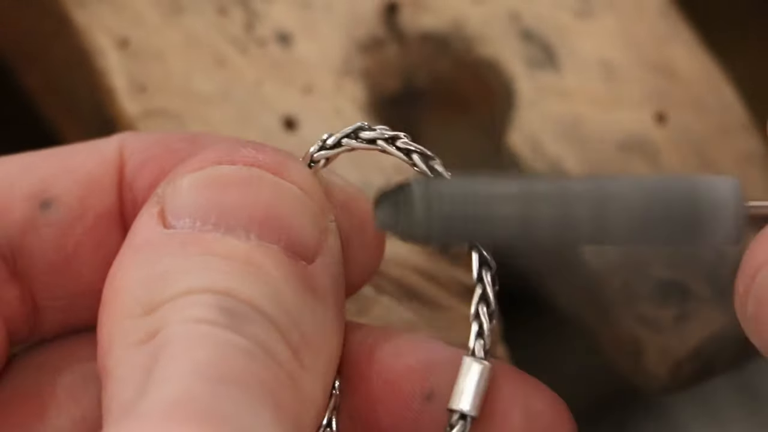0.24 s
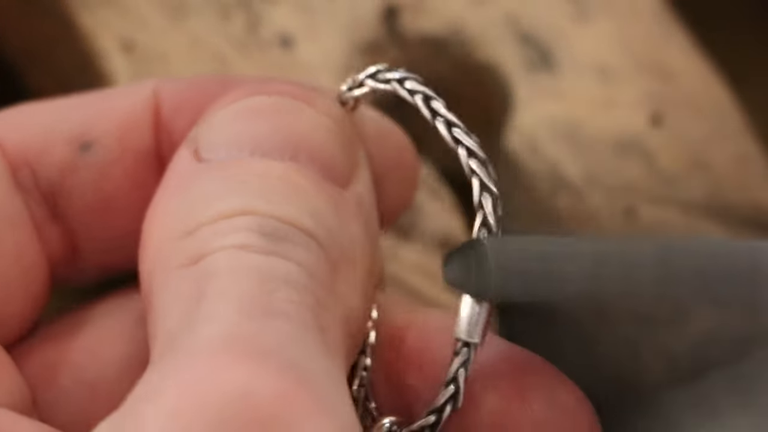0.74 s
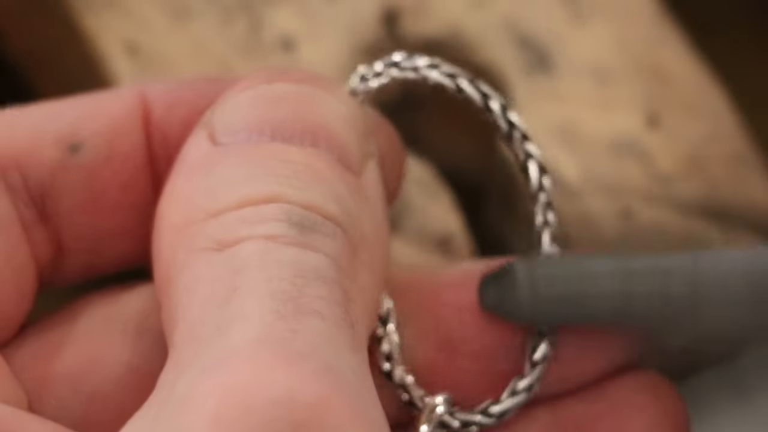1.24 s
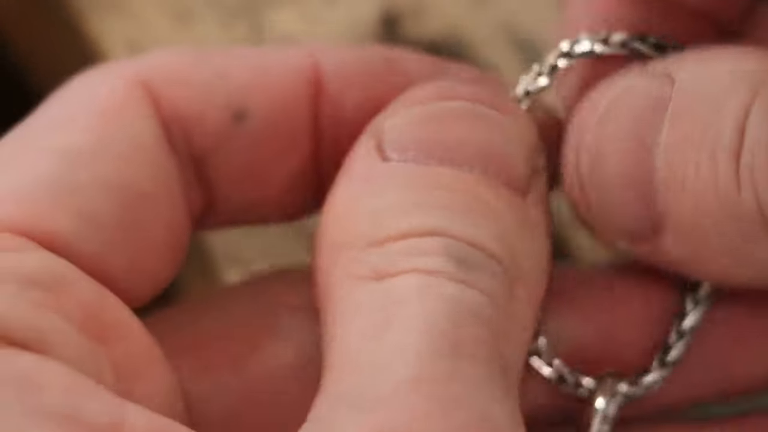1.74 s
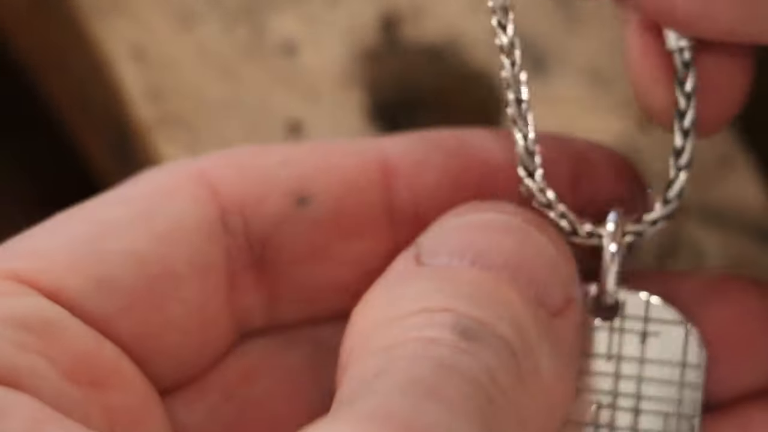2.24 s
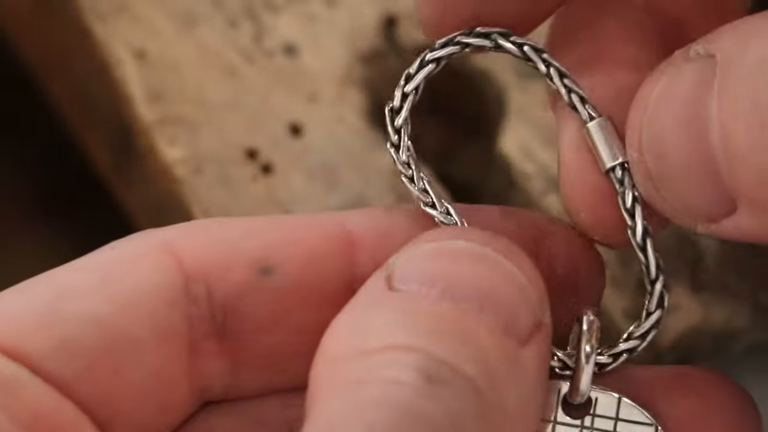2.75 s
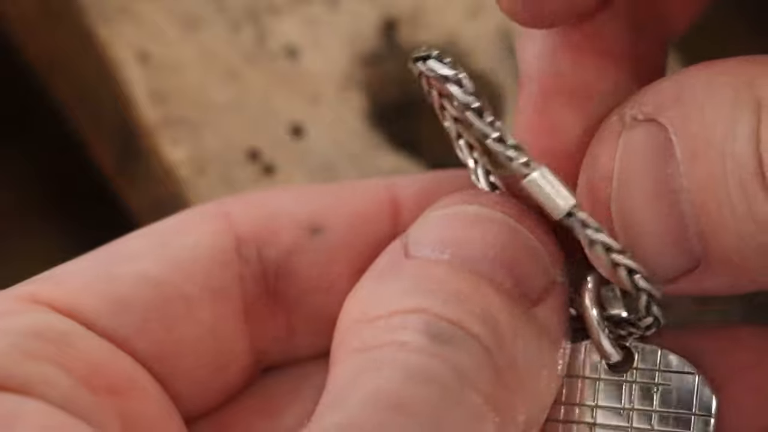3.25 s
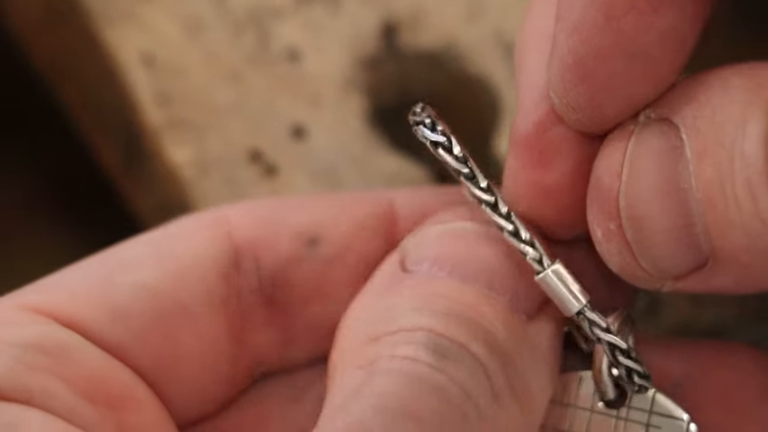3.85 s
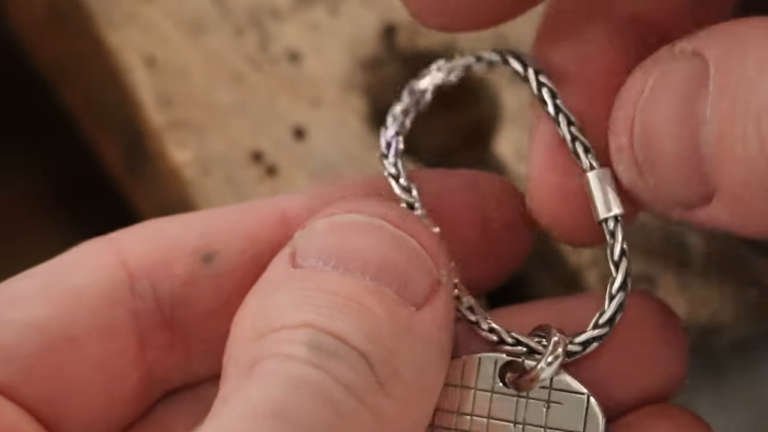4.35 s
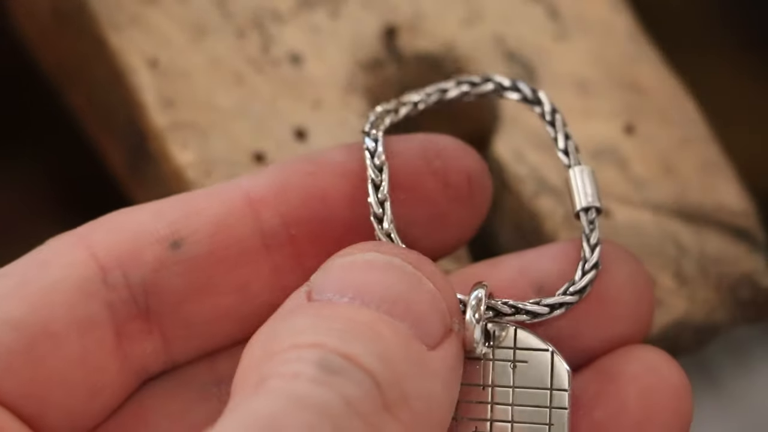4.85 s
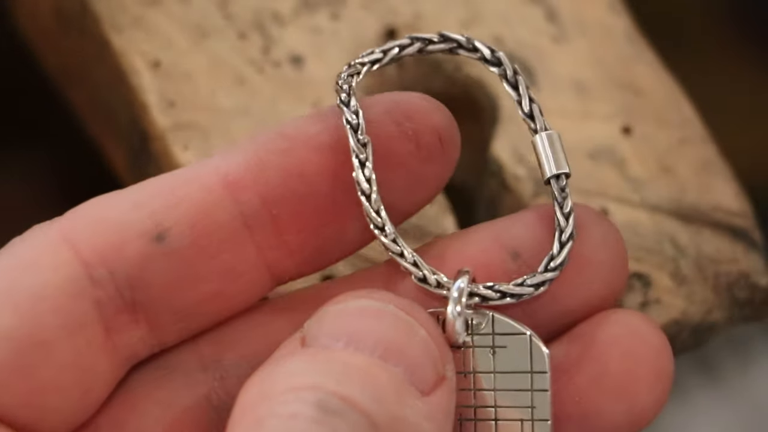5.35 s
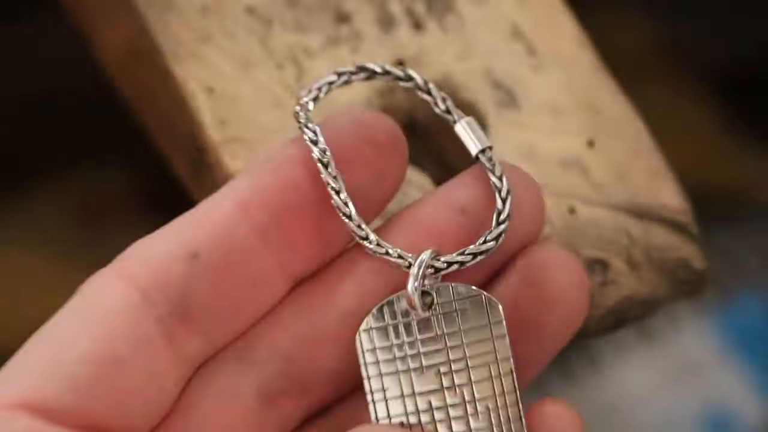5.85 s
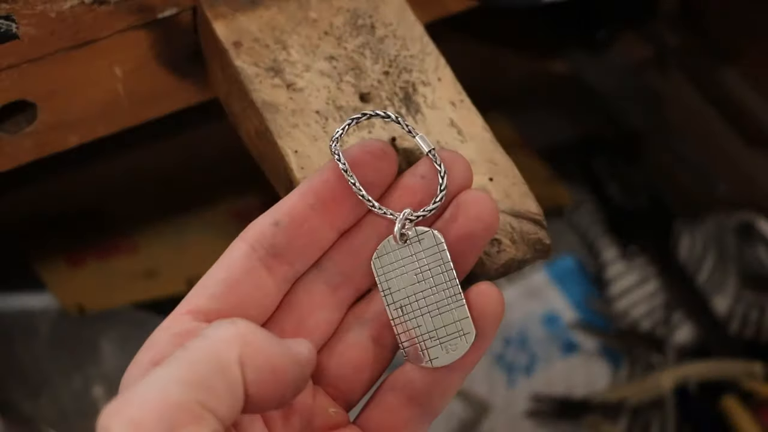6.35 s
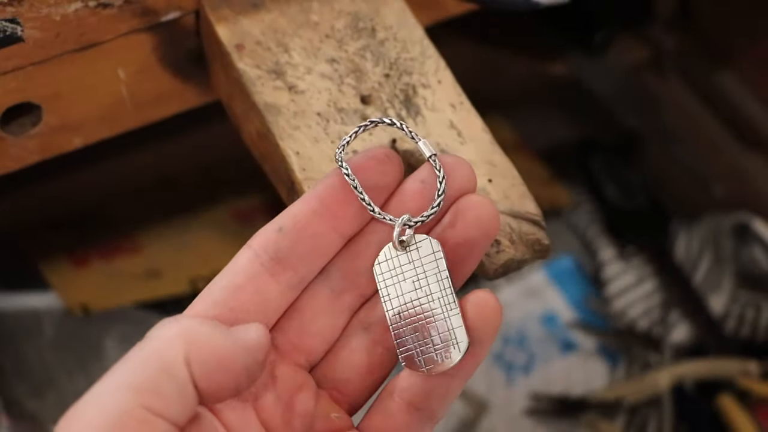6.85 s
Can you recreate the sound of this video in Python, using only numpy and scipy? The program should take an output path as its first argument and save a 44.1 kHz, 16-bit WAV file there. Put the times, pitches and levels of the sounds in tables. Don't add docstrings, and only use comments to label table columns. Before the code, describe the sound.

A small rotary tool grinds a metal chain with a raspy whine, then coasts and hums until two knocks stop it, leaving faint workshop rustles.

```python
import sys
import numpy as np
from scipy import signal
from scipy.fft import rfft, irfft, next_fast_len
from scipy.io import wavfile

SR = 44100
rng = np.random.default_rng(int(sys.argv[2]) if len(sys.argv) > 2 else 0)


def master(y):
    cut = np.clip(np.atleast_2d(y).T, -1, 1)
    pcm = np.round(cut * 32767)
    wavfile.write(sys.argv[1], SR, pcm.astype(np.int16))


def volts_from_db(level):
    exponent = np.asarray(level, float) / 20
    return 10 ** exponent


N = 312713
T = np.arange(N) / SR

# f/Hz, likeness/1
NEAR_ALIKE = [(60, .95), (130, .999), (270, .995), (570, .9), (1200, .55), (2600, .45), (5500, .4),
              (9000, .2)]
# f/Hz, left minus right level/dB
NEAR_PAN = [(400, 3.5), (1100, 2), (2000, -7.5), (3600, -4.5), (6400, -1.5), (11000, -3.5)]
# f/Hz, phase/rad
NEAR_LEAD = [(0, -0.7), (3000, -0.85), (5300, 1), (7300, -0.91), (11700, 0.94)]
# f/Hz, likeness/1
FAR_ALIKE = [(60, .2), (130, .85), (270, .9), (570, .66), (1210, .3), (2570, .03), (11600, 0)]
# f/Hz, left minus right level/dB
FAR_PAN = [(400, 2), (1100, 1.1), (3600, 0), (11000, 1.5)]
NO_LEAD = [(0, 0), (SR, 0)]  # f/Hz, phase/rad
NEAR, FAR = (NEAR_ALIKE, NEAR_PAN, NEAR_LEAD), (FAR_ALIKE, FAR_PAN, NO_LEAD)


def curves(table):
    s, *columns = np.transpose(table)
    fade_in = np.clip((T - s[0]) / 0.0069 + (s[0] == 0), 0, 1)
    fade_out = np.clip((s[-1] - T) / 0.023, 0, 1)
    return [fade_in * fade_out] + [np.interp(T, s, c) for c in columns]


def on_hz(table, hz):
    f, v = np.transpose(table)
    return np.interp(np.log(hz + 1), np.log(f), v)


def walk(rate, size=N):
    k = int(SR / rate)
    levels = rng.standard_normal(size // k + 2)
    return np.interp(np.arange(size) / k, np.arange(size // k + 2), levels) * 1.06


def swells(rows, attack, t60, column=2):
    out = np.zeros(N)
    for r in rows:
        a = int(r[0] * SR)
        t = T[a:a + int((r[1] + 2 * t60) * SR)] - r[0]
        rise = np.clip(t / attack + (a == 0), 0, 1)
        decay = np.exp(-np.log(1000) * np.clip(t - r[1], 0, 1) / t60)
        out[a:a + len(t)] += volts_from_db(r[column]) * rise * decay
    return out


def hiss(spectrum, ports, span, flicker_db, rate, gate=None):
    a, b = int(span[0] * SR), min(int(span[1] * SR), N)
    size = next_fast_len(b - a)
    hz = np.arange(size // 2 + 1) * SR / size
    noise = rng.standard_normal((2, size))
    if gate is not None:
        noise[:, :b - a] *= gate[a:b]
    mid, side = rfft(noise)
    alike, pan, lead = ports
    likeness = np.clip(on_hz(alike, hz), -.9, 1)
    shade = np.clip(hz / 1100, 0, 1) ** 2
    phase = shade * np.interp(hz, *np.transpose(lead))
    lean = volts_from_db(shade * on_hz(pan, hz) / 2) * np.exp(.5j * phase)
    mid, side = mid * np.sqrt(1 + likeness), side * np.sqrt(1 - likeness)
    colour_db = on_hz(spectrum, hz)
    pair = np.array([(mid + side) * lean, (mid - side) / lean]) * volts_from_db(colour_db)
    if flicker_db:
        place = 2 * np.log2(hz + 1)
        heard = place[(colour_db > -38) & (hz > spectrum[0][0]) & (hz < spectrum[-1][0])]
        part = 0
        for k in range(int(heard[0]), int(heard[-1]) + 2):
            band = irfft(pair * np.clip(1 - abs(place - k), 0, 1), size)
            part = part + band * volts_from_db(flicker_db * walk(rate, size=size))
    else:
        part = irfft(pair, size)
    out = np.zeros((2, N))
    out[:, a:b] = part[:, :b - a] / np.std(part.mean(0))
    return out


def tone(hz, wobble_db, rate, drift=0., until=7.1):
    size = min(int(until * SR), N)
    turns = np.cumsum((hz + 0 * T)[:size] + drift * walk(rate, size=size)) / SR + rng.random()
    line = np.sqrt(2) * np.sin(2 * np.pi * turns) * volts_from_db(wobble_db * walk(rate, size=size))
    return np.pad(line, (0, N - size))


def ring(modes, spread, push):
    t = np.arange(int(.2 * SR)) / SR
    y = 0
    for hz, db, t60 in modes:
        share, detune = rng.standard_normal(2)
        sine = np.sin(2 * np.pi * hz * (1 + spread * detune) * t)
        y = y + volts_from_db(db + 2.5 * share) * sine * 1000. ** (-t / t60)
    y = np.convolve(y, np.hanning(int(push * SR) + 3))[:len(t)]
    return y / abs(y).max()


def burst(hz, width_hz, t60):
    t = np.arange(int(.2 * SR)) / SR
    edges = np.clip([hz - width_hz / 2, hz + width_hz / 2], 300, 12000)
    noise = 0.7 * rng.standard_normal(len(t)) + 0.5 * rng.standard_normal((2, len(t)))
    noise = noise * np.minimum(t / .0006, 1) * 1000. ** (-t / t60)
    y = signal.sosfilt(signal.butter(2, edges, "bandpass", fs=SR, output="sos"), noise)
    return y / abs(y.mean(0)).max()


def add(out, s, sound):
    i = int(s * SR)
    out[:, i:i + sound.shape[-1]] += sound[..., :N - i]


def shaft(turns_hz, on, press, fast_db):
    # t/s, level/dB
    unbalance = [(0, -36), (.25, -43), (.55, -39), (.73, -33.5), (1.03, -47), (1.5, -43), (1.63, -32.5),
                 (1.66, -31)]
    # t/s, level/dB
    rundown = [(1.62, -35), (1.69, -33), (2.034, -45.5), (2.166, -46), (2.22, -37)]
    # t/s, length/s, level/dB
    straight = [
        (0, 0.18, -35),
        (.22, 0.52, -31),
        (.85, 0.675, -33),
    ]
    # t/s, length/s, level/dB
    bends = [(0, 0.093, -33), (.23, 0.014, -34), (.56, 0.012, -31), (.74, 0.1, -32), (1.14, 0.089, -30.5),
             (1.24, 0.32, -36)]
    # multiple of shaft rate/1, level/dB
    shaft_orders = [(1, -7), (2, -1.5), (3, 0), (4, -1), (5, -8), (6, -11.5), (7, -11), (8, -16), (9, -8.5),
                    (10, -14), (11, -10), (12, -8.5), (13, -23), (14, -8), (20, -11.5), (22.7, -8)]
    # t/s, length/s, level/dB, order/1
    whips = [(0, .12, -37, 8.), (0, .13, -39, 5.), (0, .15, -42, 6.), (.07, .04, -39, 9.),
             (.27, .08, -41, 12.), (.5, .1, -40, 5.), (.76, .06, -40, 7.), (.77, .12, -37, 9.),
             (.78, .04, -40, 10.), (.8, .06, -37, 5.), (.85, .06, -38, 12.), (1.15, .35, -42, 9.),
             (1.15, .15, -43, 7.), (1.3, .2, -42, 12.)]
    end, stopped = 1.7, 2.22
    drive, first_db = curves(unbalance)
    free, free_db = curves(rundown)
    first = np.maximum(drive * volts_from_db(first_db), free * volts_from_db(free_db))
    lines = first * tone(turns_hz, 1.0, 22.0, until=stopped)
    third = swells(straight, 0.032, 0.16)
    fourth = volts_from_db(-43) + swells(bends, 0.0042, 0.053)
    for k, gain in ((3, third), (4, fourth)):
        lines += on * gain * tone(k * turns_hz, 1.0, 9.6, until=end)
    commutator = tone(12 * turns_hz, 9.3, 20, drift=14.3, until=stopped)
    lines += free * volts_from_db(free_db - 20) * commutator
    whip = drive * volts_from_db(-37 + .6 * press + fast_db)
    for k, db in shaft_orders:
        if k not in (1, 3, 4):
            lines += whip * volts_from_db(db) * tone(k * turns_hz, 4.77, 22, drift=0.928 * k, until=end)
    for row in whips:
        lines += swells([row], .02, 0.11) * tone(row[3] * turns_hz, 1.7, 23.85, drift=4., until=end)
    return lines


def scratch(rub_db, press, fast_db, throb):
    # f/Hz, level/dB per Hz
    rub_body = [(710, -16), (1200, -8), (1450, -24), (1580, -5), (2060, -2.5), (2460, -3), (3020, 0),
                (3940, -5.5), (4800, -5), (6240, -13.5), (10600, -120)]
    # f/Hz, level/dB per Hz
    rub_edge = [(2470, -21), (4200, -22), (5590, -1.5), (6870, 3), (8380, -0.5), (8570, -5.5), (9070, -1),
                (9350, -4), (11200, -5), (12000, -16), (15600, -42), (22000, -120)]
    # f/Hz, level re contact/dB
    links = [(1300, -23), (1690, -22), (1880, -19), (2132, -21), (2980, -21), (3423, -21), (4812, -27),
             (6773, -22), (6900, -23)]
    span = (0, 1.7)
    grit = throb * volts_from_db(1.3 * walk(1500) + .5 * walk(120))
    body = hiss(rub_body, NEAR, span, 0.64, 17.9, grit)
    edge_db = -3.5 - 0.5 * press + 0.16 * fast_db
    edge = volts_from_db(edge_db) * hiss(rub_edge, NEAR, span, 3.9, 17.2, grit)
    rings = np.zeros((2, N))
    for f, db in links:
        pair = np.array([tone(f, 4, 45, drift=14, until=span[1]) for port in range(2)])
        rings += volts_from_db(db + np.array([[-2], [2]])) * pair
    return volts_from_db(rub_db) * (body + edge + rings)


def squeal():
    # t/s, f/Hz
    pitch = [(0, 8800), (.12, 8810), (.17, 8930), (.22, 8950), (.245, 8800), (1.2, 8810), (1.31, 8860),
             (1.6, 8800)]
    # t/s, length/s, level/dB
    squeals = [(0, .04, -31), (.07, 0.025, -35), (.1, 0.019, -20.5), (.15, 0.062, -36), (.237, 0.016, -22),
               (1.05, 0.077, -38), (1.17, .07, -36), (1.265, 0.098, -33.5), (1.385, 0.026, -31),
               (1.42, 0.069, -39), (1.58, 0.025, -29)]
    pan_db, lag = -3, 1
    note = tone(curves(pitch)[1], 2.5, 90, drift=35, until=1.7)
    whistle = np.array([np.roll(note, lag) * volts_from_db(pan_db / 2), note * volts_from_db(-pan_db / 2)])
    return (volts_from_db(-47) + swells(squeals, .02, .07)) * whistle


def casing(press, throb):
    # f/Hz, level/dB per Hz
    shell = [(24, -55.5), (40, -8), (80, -13), (129, -7), (182, -5.5), (232, -16), (287, 2.5), (519, -5.5),
             (1500, 1), (1950, -50), (3300, -120)]
    return volts_from_db(-33 + 0.54 * press) * hiss(shell, NEAR, (0, 1.7), 3.5, 19.83, throb)


def catches():
    # t/s, level/dB, f/Hz, length/s
    snags = [(0.141, -25.5, 2900, 0.008), (0.133, -27.5, 6900, 0.015), (0.198, -28, 6550, 0.028),
             (0.196, -27, 1290, 0.009), (0.208, -26, 2680, 0.0091), (0.194, -27, 3330, 0.013),
             (0.408, -25, 3100, 0.008), (0.535, -29, 6500, 0.0092), (0.588, -31, 3000, .008),
             (0.685, -27, 3200, .006), (0.806, -30, 5500, 0.016), (.826, -30, 2300, 0.0053),
             (0.924, -25.5, 5800, .008), (1.061, -28, 2020, 0.0089), (1.232, -34, 2150, 0.006),
             (1.398, -32, 6700, .015), (1.536, -31, 2900, 0.0035), (1.595, -32.5, 8000, .008),
             (0.703, -23.5, 1720, 0.0056), (.712, -30, 1350, 0.016), (0.713, -21.5, 2200, 0.0066),
             (0.724, -28, 1990, 0.011), (0.787, -26, 3040, 0.02), (0.857, -26.5, 3400, 0.025),
             (0.864, -26, 5840, 0.018), (0.936, -28.5, 2400, 0.02), (1.091, -27, 7400, 0.027),
             (1.379, -31.5, 3280, 0.018), (1.574, -23, 3100, 0.0079), (5.126, -50, 2230, 0.035),
             (6.19, -49, 1520, 0.018), (6.198, -48.5, 2500, 0.026), (6.192, -51, 5350, 0.019),
             (0.834, -38, 4700, 0.039)]
    out, t = np.zeros((2, N)), np.arange(-.1, .1, 1 / SR)
    for s, db, hz, length in snags:
        colour = [(hz / 1.45, -24), (hz, 0), (hz * 1.45, -24)]
        link = hiss(colour, NEAR, (0, .21), 0, 30)[:, :len(t)]
        add(out, s + t[0], volts_from_db(db) * np.exp(-(t / length) ** 2) * link)
    return out


def handpiece():
    # t/s, turns per second/Hz
    speed = [(0, 100), (.3, 97.5), (.6, 94.3), (1.62, 94), (1.76, 85), (1.96, 76), (2.22, 64)]
    # t/s, contact level/dB
    pressure = [(0, -26), (.2, -26.5), (.28, -28), (.5, -28.5), (.68, -29.5), (.75, -27), (.775, -24.5),
                (.87, -24), (.9, -26.5), (.93, -25), (.955, -30), (1.04, -29), (1.09, -26.5), (1.14, -28),
                (1.3, -28.5), (1.552, -27), (1.585, -25.5), (1.6, -32)]
    turns_hz, rub_db = curves(speed)[1], curves(pressure)[1]
    fast_db = 0.24 * (turns_hz - speed[3][1])
    press = rub_db + 25.5
    on = swells([(0, pressure[-1][0], 0)], .01, 0.36)
    throb = 1 + 0.023 * np.cos(2 * np.pi * np.cumsum(turns_hz) / SR)
    contact = scratch(rub_db, press, fast_db, throb) + squeal() + casing(press, throb)
    return shaft(turns_hz, on, press, fast_db) + on * contact + catches()


def motor():
    # f/Hz, level/dB per Hz
    rumble = [(15, -72), (25, -26), (124, -4), (152, -1), (179, -1), (249, -0.5), (352, -11.5), (395, -17),
              (532, -8.5), (705, -11.5), (998, -38), (1100, -39), (1300, -53), (1690, -71), (2860, -120)]
    pedal_s, slow_s, stop_s = 1.39, 4.88, 5.07
    left_lag = 3
    on = np.clip((stop_s - T) / 0.011, 0, 1)
    dip = (T > pedal_s) * np.exp(-abs(T - pedal_s) / 0.35)
    sag = np.clip((T - slow_s) / 0.021, 0, 1)
    third = volts_from_db(-36 - 9 * dip - 2.5 * sag)
    fourth = volts_from_db(-41 - 16 * dip - 24 * sag - 39 * (T < pedal_s))
    lines = np.zeros(N)
    for hz, gain in ((180.3, third), (238.7, fourth), (298, fourth * volts_from_db(-8.0))):
        lines += gain * tone(hz, 0.57, 22, drift=1.54, until=5.1)
    lines = np.array([np.roll(lines, left_lag), lines])
    return on * (lines + volts_from_db(-40.5) * hiss(rumble, NEAR, (0, 5.1), 2.15, 12))


def grip():
    # t/s, length/s, level/dB
    creaks = [(.5, 0.3, -74), (2.18, 0.16, -51), (2.7, 0.076, -47), (3.2, 0.12, -37), (3.7, 0.1, -43),
              (4.45, .1, -59), (4.95, 0.055, -44), (5.15, .08, -42), (5.36, 0.073, -42), (5.8, 0.12, -61),
              (6.2, 0.12, -60.5), (6.5, 0.31, -60), (6.9, .2, -49.5)]
    # f/Hz, level/dB per Hz
    grip_colour = [(20, -28), (45, 9), (90, 2), (150, 3), (260, -10), (500, -14), (900, -120)]
    shudder = hiss(grip_colour, FAR, (0, N / SR), 0, 8, volts_from_db(6.9 * walk(12)))
    left_right_db = np.array([[-9], [0]])
    return (volts_from_db(-63.5) + swells(creaks, 0.051, 0.23)) * shudder * volts_from_db(left_right_db)


def workshop():
    # f/Hz, level/dB per Hz
    room = [(15, -43), (25, -9), (59, -11), (97, -27.5), (291, -12.5), (335, -20.5), (400, -3), (460, -15),
            (521, -14.5), (768, -16), (885, -19), (1700, -28), (2210, -45), (3740, -120)]
    # f/Hz, level/dB per Hz
    capsule = [(880, -13), (1500, 0), (3230, -10.5), (6040, -14), (6710, -12.5), (11400, -19.5),
               (12000, -38), (15600, -51.5), (22000, -120)]
    span = (1.4, N / SR)
    return volts_from_db(-49) * hiss(room, FAR, span, 4.1, 8.7) + volts_from_db(-62) * hiss(capsule, FAR, span, 0, 5.9)


def bearings():
    # t/s, level/dB
    coast = [(1.6, -41), (1.66, -33.5), (2.15, -39.5), (2.8, -43), (3.41, -42.5), (4.77, -51), (4.98, -49),
             (5.09, -54)]
    # f/Hz, level/dB per Hz
    whirr_colour = [(530, -6), (900, -2), (1030, -8), (1110, 5), (1240, -13), (1410, -3.5), (1540, -9.5),
                    (1730, -6), (1990, -0.5), (2160, -2.5), (2900, 2), (3460, -5.5), (4300, -8),
                    (5590, -18), (9460, -120)]
    # f/Hz, level/dB per Hz
    top_colour = [(2350, -32), (4000, -12), (4340, -7.5), (4700, -8), (5210, 0), (5830, 0), (6580, -18.5),
                  (6800, -11), (8840, -23), (15000, -120)]
    # f/Hz, level/dB per Hz
    air_colour = [(3820, -15), (6500, 5.5), (6720, 2.5), (10000, 4.5), (11600, -5), (12000, -59),
                  (15600, -56), (22000, -120)]
    # t/s, length/s, level/dB
    jolts = [
        (1.98, 0.055, -39.5),
        (4.8, 0.067, -70),
        (4.975, 0.0092, -62),
    ]
    # f/Hz, likeness/1
    coast_alike = [(500, .7), (1000, .55), (2000, .45), (4000, .35), (6500, .55), (9000, .12)]
    # f/Hz, left minus right level/dB
    coast_pan = [(400, -7), (1100, 0.5), (2000, -7), (3600, -7.5), (6400, -3), (11000, -7)]
    # f/Hz, phase/rad
    coast_lead = [(0, -1), (5250, -1.7), (7800, -14), (9200, -7.5), (11700, -8.5)]
    ports, span = (coast_alike, coast_pan, coast_lead), (1.55, 5.1)
    on, whirr_db = curves(coast)
    settled = 1 / (1 + np.exp((3.2 - T) / 0.17))
    jolt = swells(jolts, 0.018, 0.12)
    roll = volts_from_db(0.53 * walk(500) + 1.0 * walk(70))
    low = hiss(whirr_colour, ports, span, 1.6, 21.8, roll)
    top = hiss(top_colour, ports, span, 1.1, 21.8, roll)
    air = hiss(air_colour, ports, span, 0, 21.8, roll)
    unlaid = np.clip((2.14 - T) / 0.076, 0, 1)
    top_db, air_db = 2 - 11 * settled - 3.5 * unlaid, -7.5 - 4 * settled
    whirr = low + volts_from_db(top_db) * top + volts_from_db(air_db) * air
    jolted = low + volts_from_db(-1) * top + volts_from_db(2.5) * air
    return on * (volts_from_db(whirr_db) * whirr + jolt * jolted)


def bench():
    # t/s, knock level/dB, boom level/dB, crack level/dB
    blows = [(1.6255, -16.5, -25.5, -44), (5.086, -14.5, -27, -49), (5.093, -13, -28, -40),
             (5.101, -18, -20, -46), (5.268, -41, -24, -27), (5.312, -18, -34, -45), (5.316, -17, -21, -28),
             (5.322, -14, -15, -22), (5.34, -17.5, -36, -40), (5.544, -51, -56, -54),
             (5.821, -31, -50, -58), (6.091, -36, -46, -66), (6.097, -35, -45, -66), (6.43, -43, -47, -69)]
    # f/Hz, level/dB, t60/s
    bench_modes = [(134, 18, 0.098), (162, 7, 0.059), (260, -16, .04)]
    # f/Hz, level/dB, t60/s
    board_modes = [(527, 2, 0.14), (633, 6.5, 0.092), (884, 11, 0.054), (1343, 7, 0.037), (1860, -8, 0.039)]
    # t/s, level/dB, f/Hz, t60/s, left minus right
    # level/dB
    ticks = [(1.5914, -10, 8340, 0.01, 9), (1.6054, -32, 4900, 0.02, -3.0), (1.626, -21.5, 700, 0.023, -2),
             (4.8846, -39, 2800, 0.018, -16), (4.981, -37.5, 3460, 0.022, -16),
             (5.0861, -18.5, 1940, 0.029, -5), (5.087, -30, 3000, 0.013, -1.5),
             (5.0924, -30, 2650, 0.026, -2), (5.1, -32, 2000, 0.056, 0), (5.089, -35, 4800, .02, -1),
             (5.2328, -39, 2600, 0.038, -1.5), (5.2682, -21, 4160, 0.043, -4),
             (5.2992, -30, 6200, 0.02, -4), (5.3246, -34, 2960, 0.02, -7), (5.456, -47, 4500, 0.02, -13),
             (5.5424, -45.5, 3870, 0.022, -23), (5.6568, -35.5, 7100, 0.0075, -18),
             (5.6605, -44, 1630, 0.018, -10), (5.6625, -46, 3280, 0.013, -8),
             (5.6675, -46, 3200, 0.013, -11), (5.813, -38, 6960, 0.0088, -2), (5.798, -44, 1980, .015, 1.5),
             (5.826, -40, 2200, 0.016, -1.5), (5.827, -40, 8000, .012, -8), (5.993, -39, 1200, .02, -1),
             (6.1517, -48, 1800, .015, -1.5), (5.855, -45, 2200, 0.028, -1), (6.4444, -67, 3690, 0.02, -5)]
    out = np.zeros((2, N))
    for s, knock_db, boom_db, crack_db in blows:
        knock = volts_from_db(knock_db) * ring(board_modes, 0.126, .00045)
        add(out, s, knock + volts_from_db(crack_db) * burst(1870, 2300, 0.065))
        add(out, s + 0.0017, volts_from_db(boom_db + 3.0) * ring(bench_modes, 0.014, 0.0016))
        add(out, s, volts_from_db(knock_db - 23.0) * burst(1100, 2000, 0.19))
    for s, db, hz, t60, pan_db in ticks:
        lean = np.array([[pan_db], [-pan_db]]) / 2
        add(out, s, volts_from_db(db + lean) * burst(hz, 0.63 * hz, max(t60, .004)))
    return out


def hands():
    # t/s, length/s, brush level/dB, dull level/dB
    rustle = [(5.07, 0.014, -55, -38), (5.11, 0.04, -63, -46), (5.231, 0.012, -48.5, -58),
              (5.258, 0.027, -42, -38), (5.3, 0.039, -46, -36.5), (5.36, 0.038, -56, -49),
              (5.536, .008, -55.5, -50), (5.656, 0.012, -50, -63), (5.725, 0.04, -58.5, -63),
              (5.82, 0.006, -60, -50), (5.854, 0.053, -50, -49), (5.9, 0.041, -47.5, -51),
              (5.95, 0.043, -47, -47), (5.985, 0.03, -47.5, -47), (6.015, 0.031, -56.5, -56),
              (6.085, 0.014, -91, -78), (6.172, 0.029, -61.5, -49.5), (6.21, .03, -64, -53)]
    # f/Hz, level/dB per Hz
    cloth = [(710, -33), (1200, -19), (1800, -1.5), (2080, -12), (2830, -5.5), (3600, -6), (8740, -8),
             (11000, -12), (12000, -26), (15600, -51), (22000, -120)]
    # f/Hz, likeness/1
    hand_alike = [(60, .1), (200, .4), (500, .4), (1000, .05), (11600, 0)]
    ports, span = (hand_alike, FAR_PAN, NO_LEAD), (5.05, 6.4)
    still = swells([(5.1, 1.1, 0)], .02, 0.49)
    brush = swells(rustle, 0.011, 0.097) + volts_from_db(-68) * still
    dull = swells(rustle, 0.0065, 0.31, column=3) + volts_from_db(-62.5) * still
    grain = volts_from_db(2.0 * walk(400) + 0.5 * walk(82))
    dull_colour = [(40, -31.0), (100, 0.5), (400, -4.0), (1200, -3.5), (3500, -24.5)]  # f/Hz, level/dB per Hz
    shuffle = hiss(dull_colour, ports, span, 2.1, 31.26, grain)
    return brush * hiss(cloth, ports, span, 1.0, 24.1, grain) + dull * shuffle


def scene():
    lean = volts_from_db(np.array([[-2], [2]]) / 2)
    return handpiece() + bearings() + motor() + bench() + grip() + lean * (hands() + workshop())


def low_pass(x):
    return signal.sosfilt(signal.butter(12, 12100, fs=SR, output="sos"), x)


def record(dry):
    high = signal.sosfilt(signal.butter(2, 45, "highpass", fs=SR, output="sos"), dry)
    mix = signal.sosfilt(signal.ellip(10, .3, 70, 11950, fs=SR, output="sos"), high)
    return low_pass(mix)


dry = scene()
out = record(dry)
master(out)
```